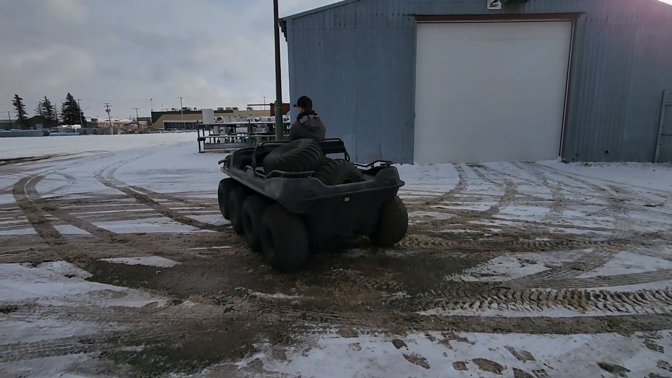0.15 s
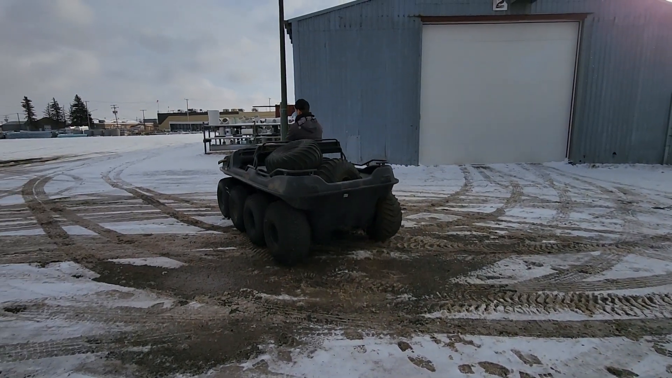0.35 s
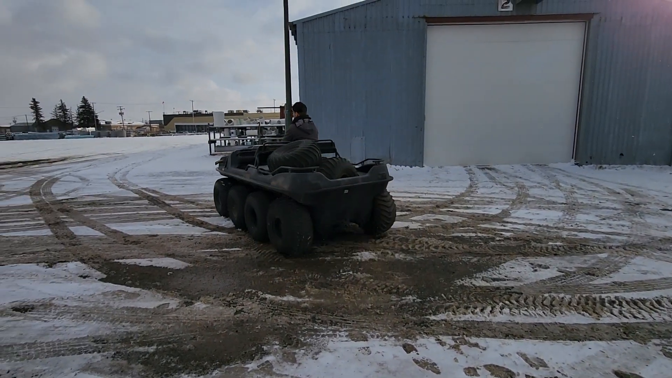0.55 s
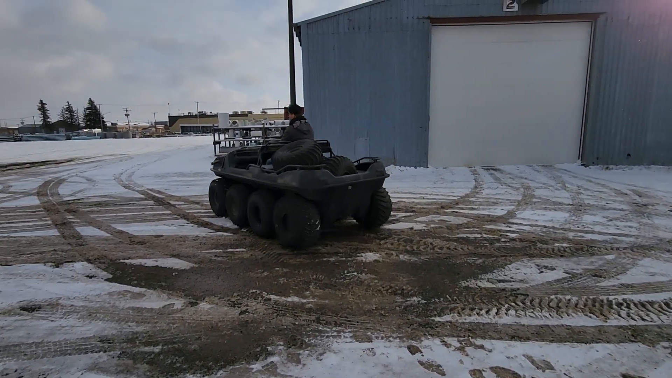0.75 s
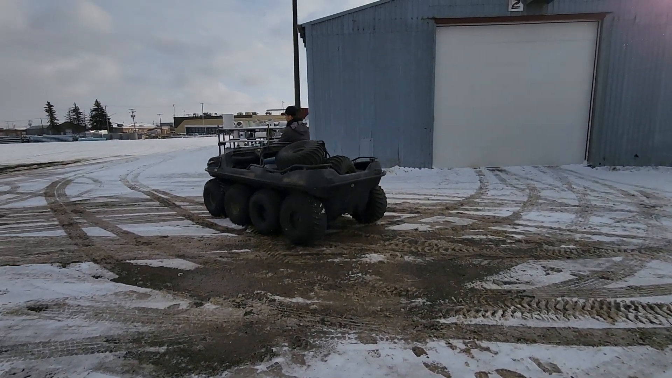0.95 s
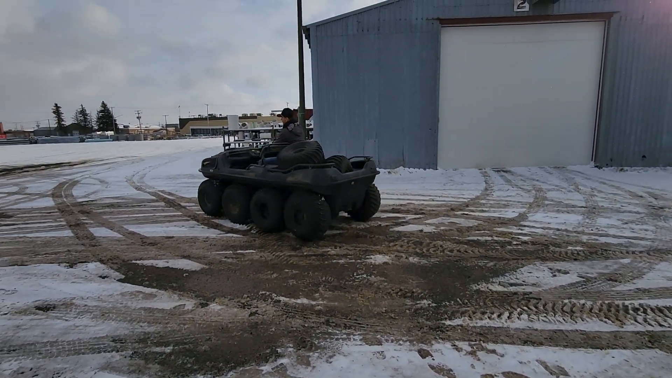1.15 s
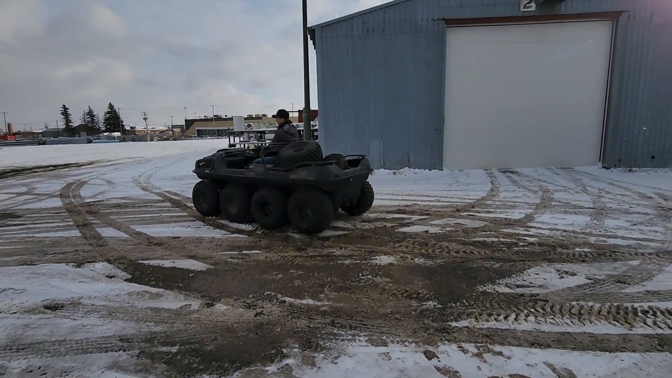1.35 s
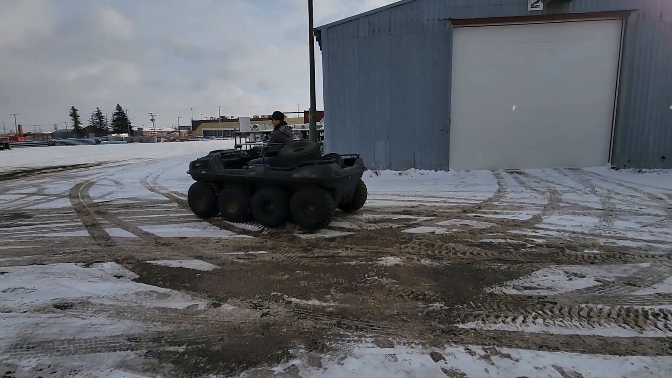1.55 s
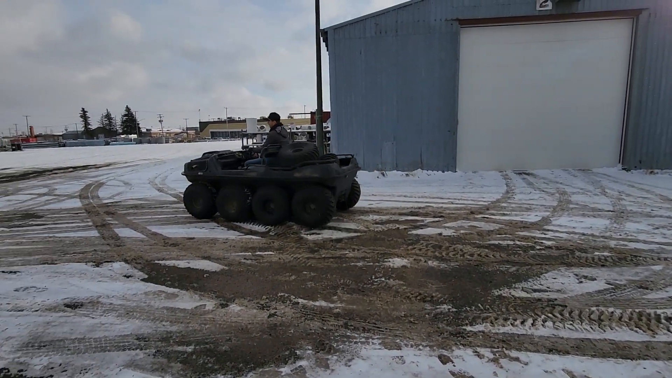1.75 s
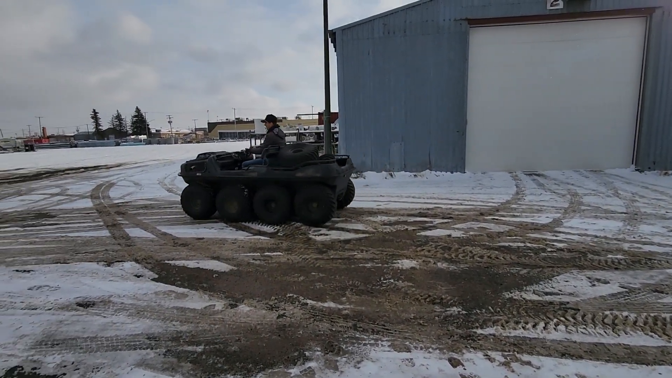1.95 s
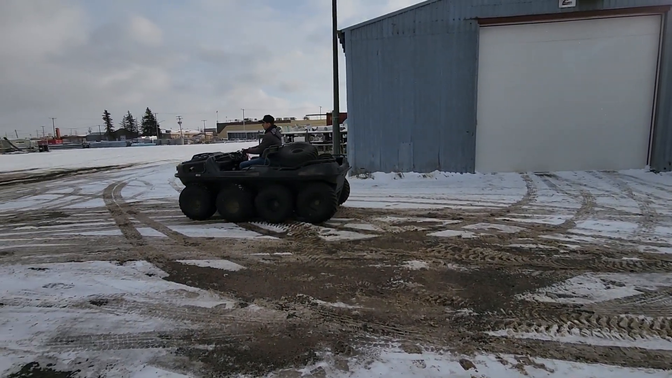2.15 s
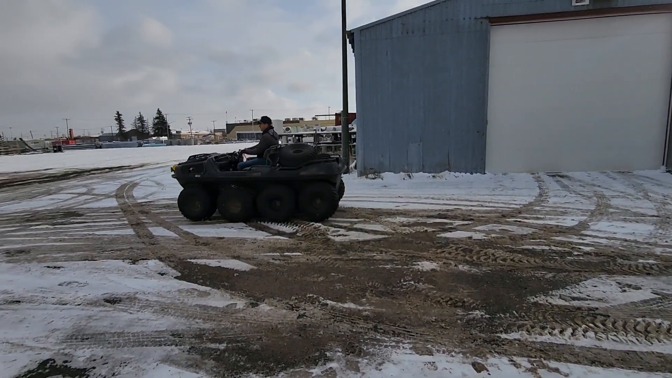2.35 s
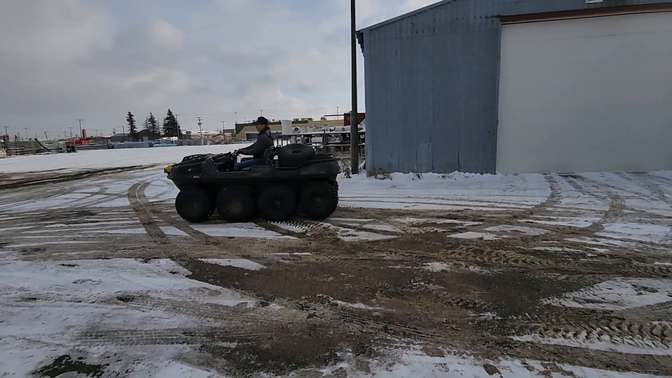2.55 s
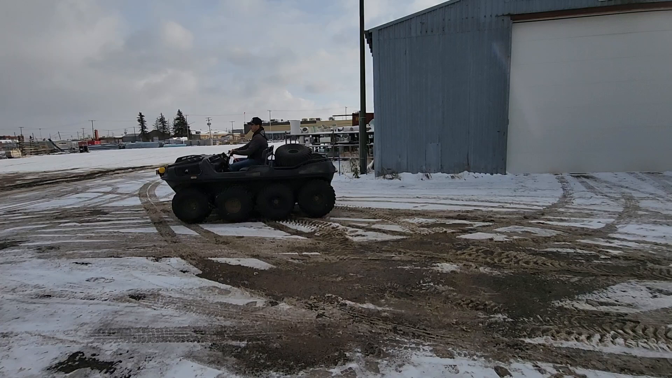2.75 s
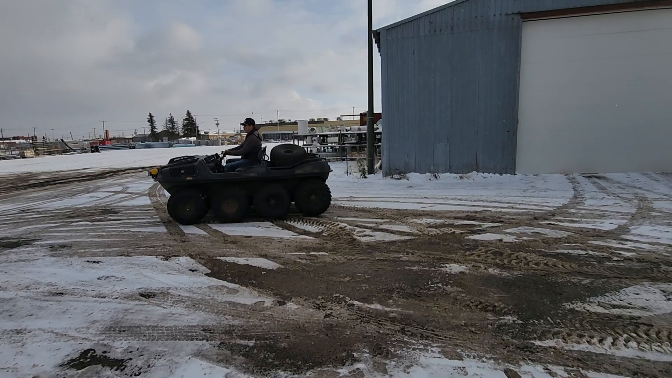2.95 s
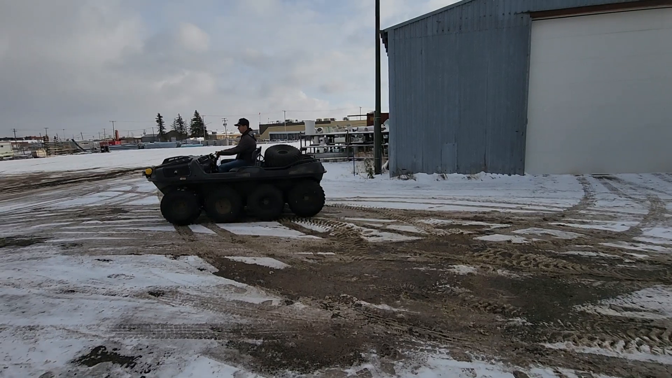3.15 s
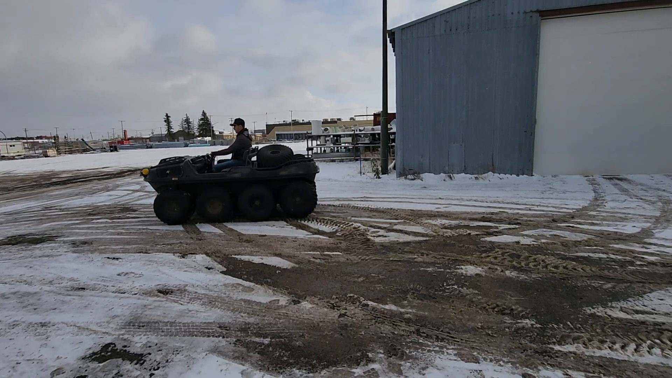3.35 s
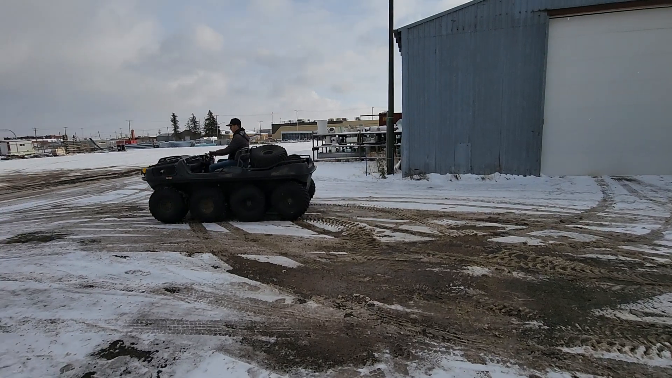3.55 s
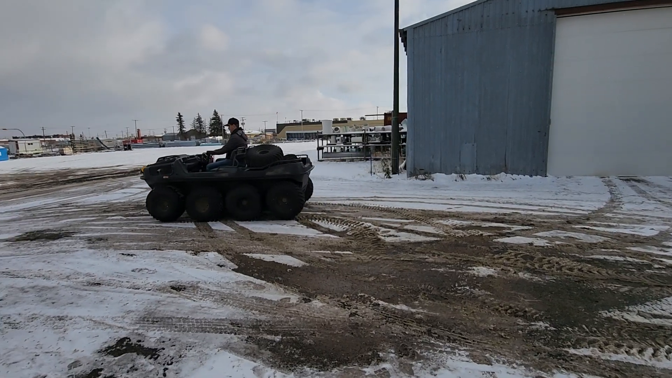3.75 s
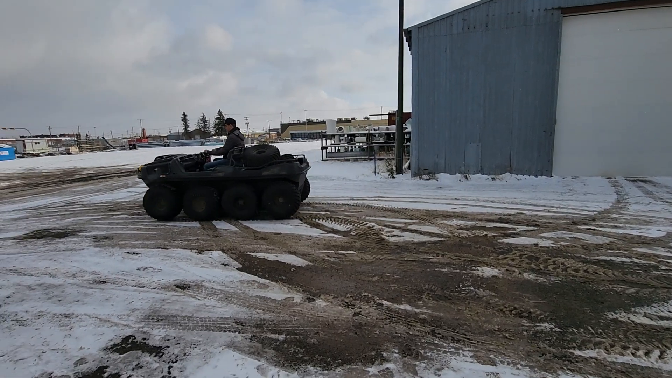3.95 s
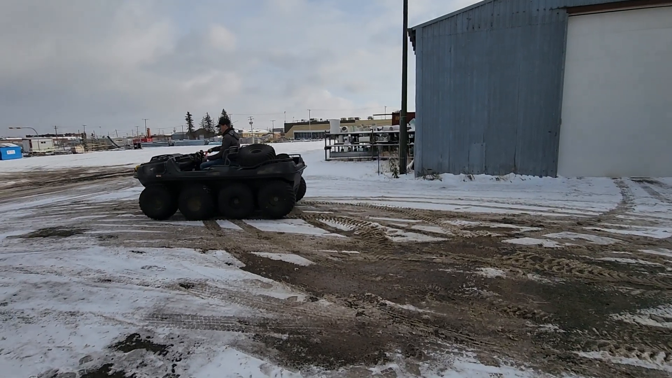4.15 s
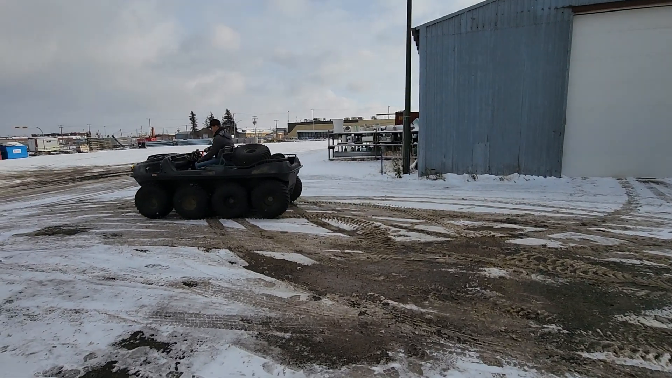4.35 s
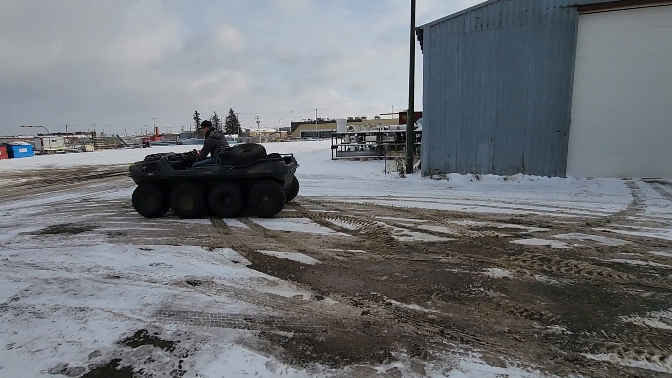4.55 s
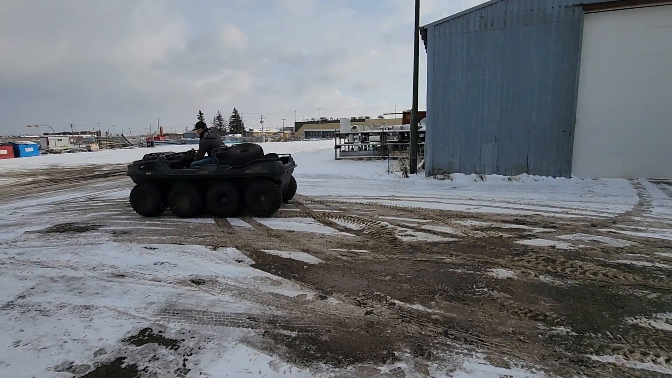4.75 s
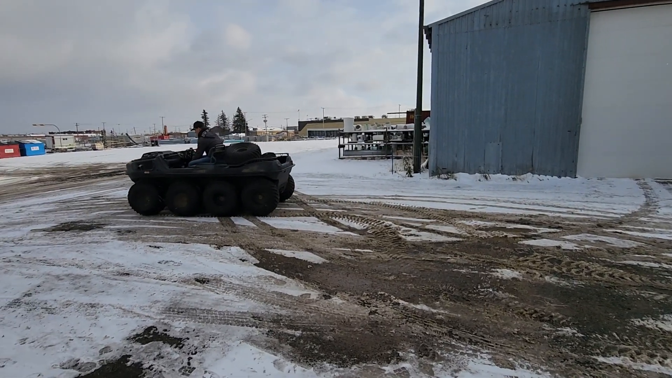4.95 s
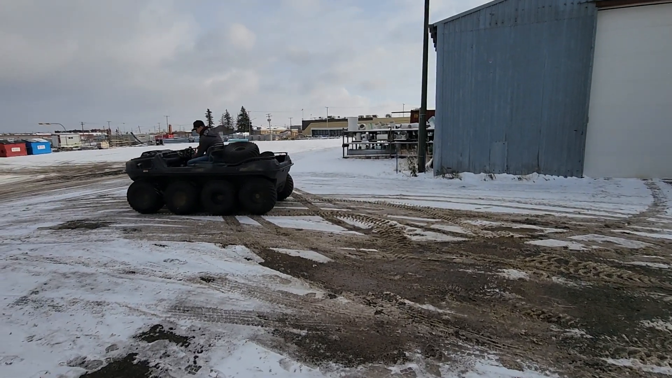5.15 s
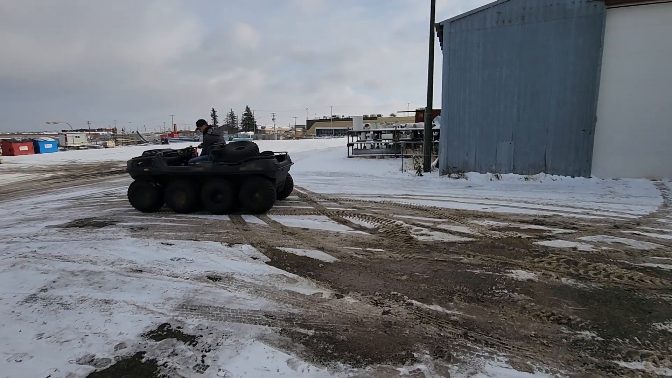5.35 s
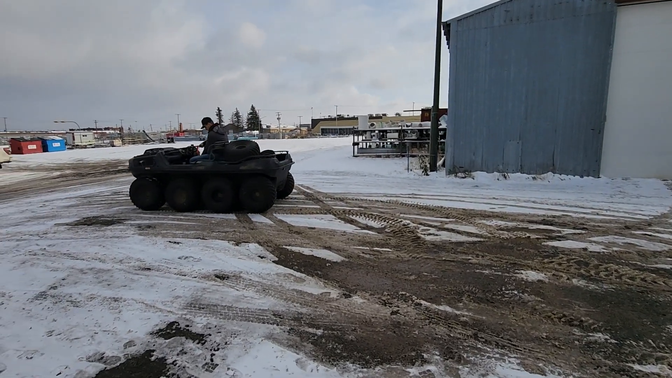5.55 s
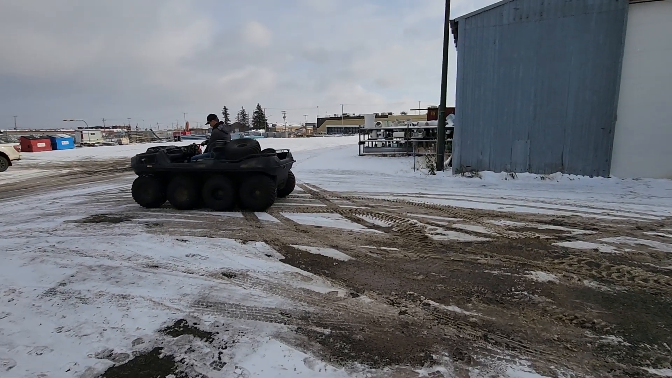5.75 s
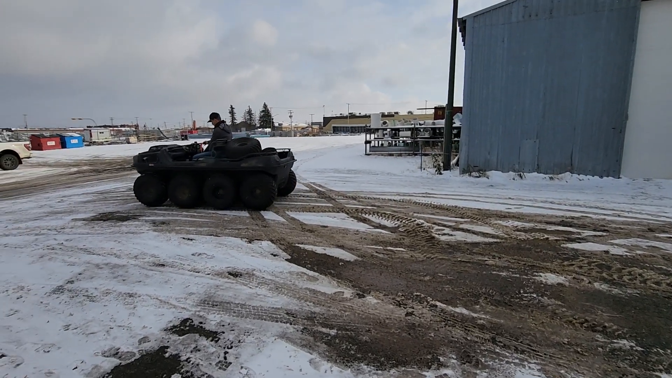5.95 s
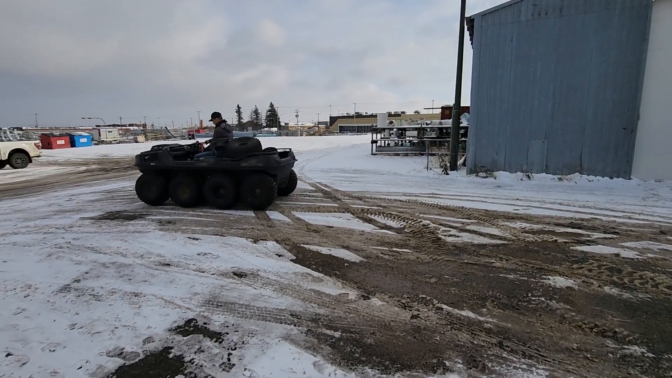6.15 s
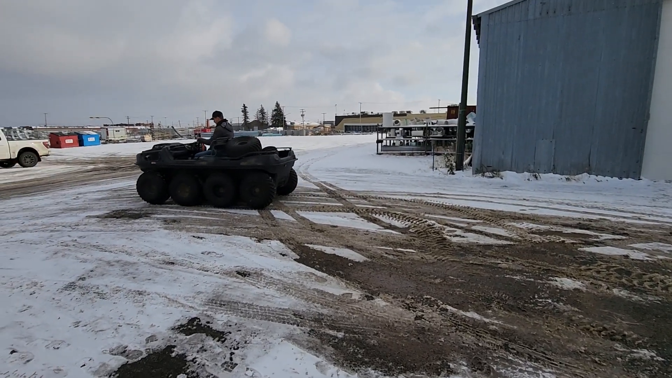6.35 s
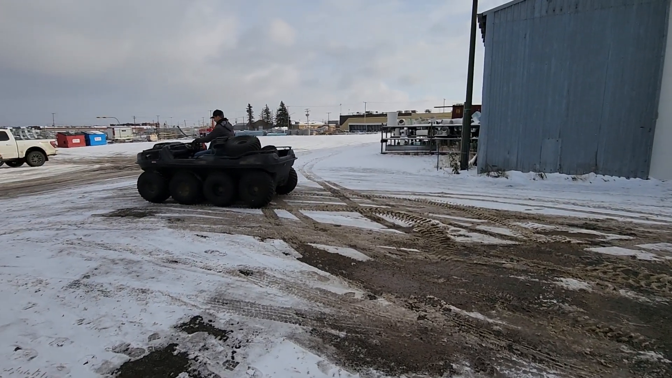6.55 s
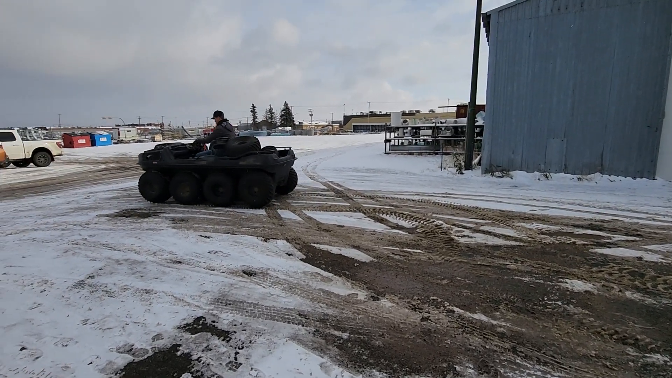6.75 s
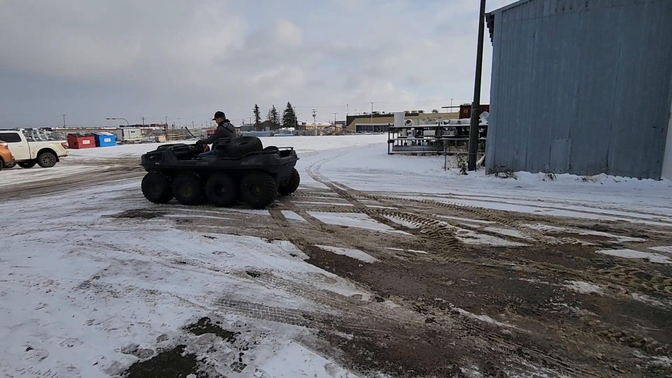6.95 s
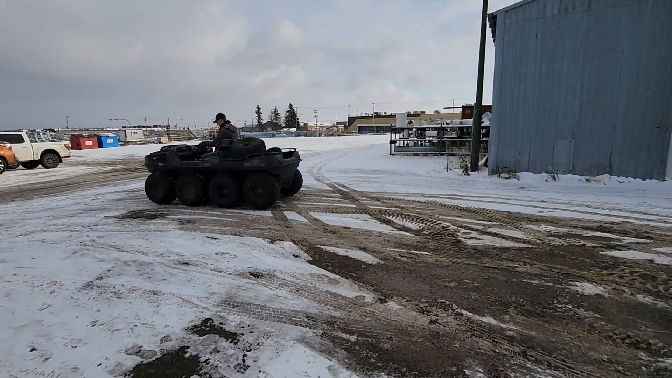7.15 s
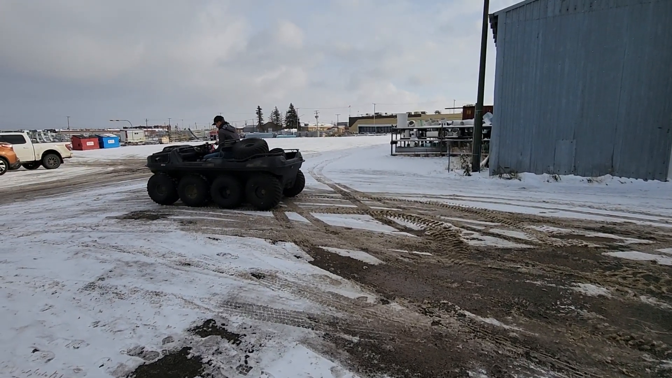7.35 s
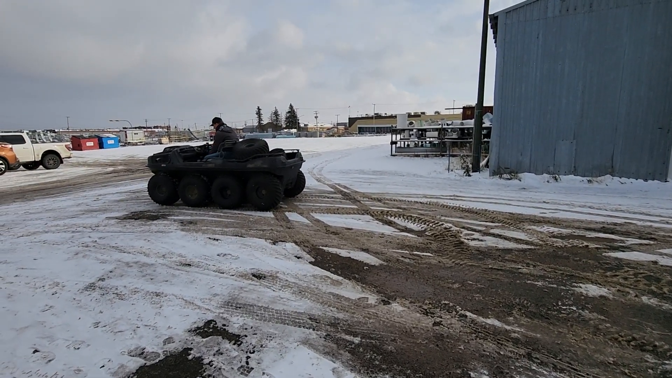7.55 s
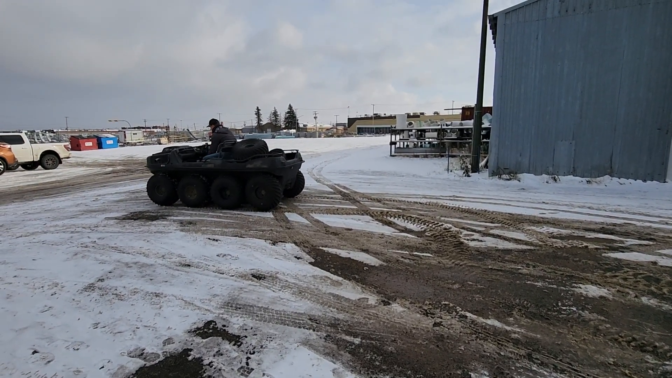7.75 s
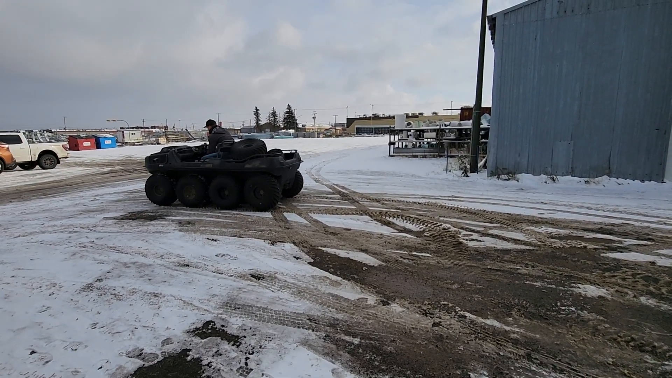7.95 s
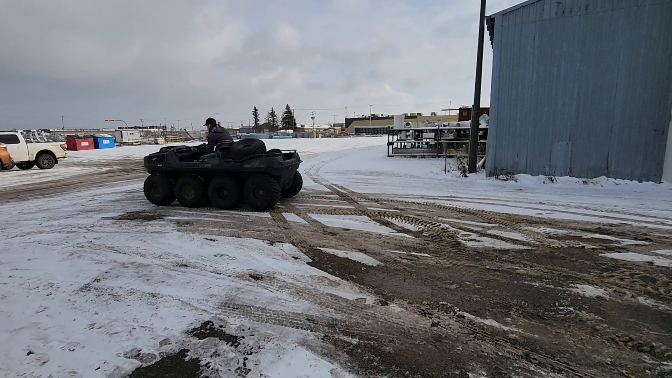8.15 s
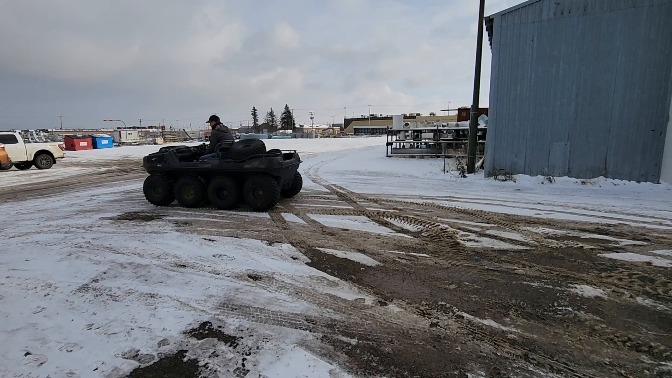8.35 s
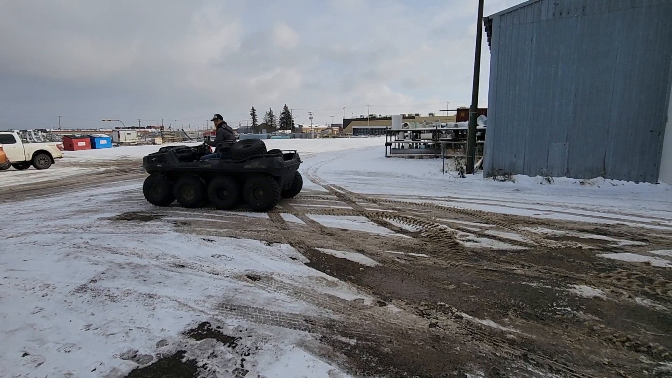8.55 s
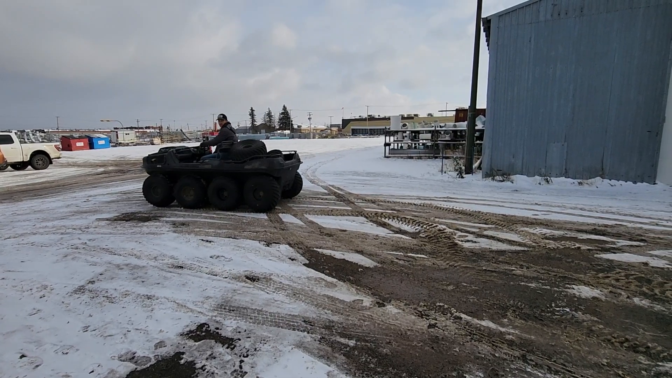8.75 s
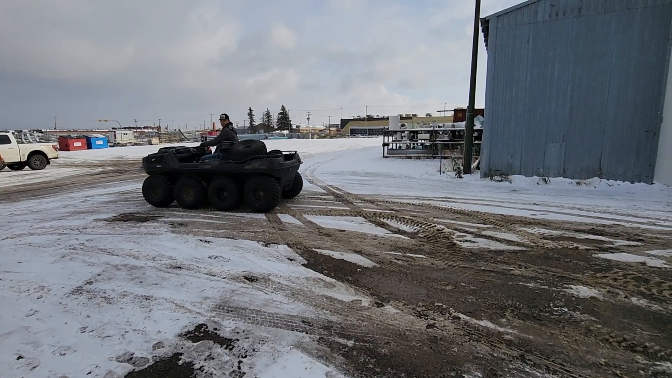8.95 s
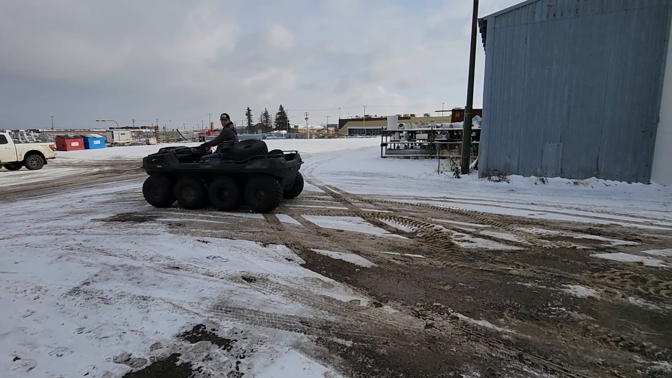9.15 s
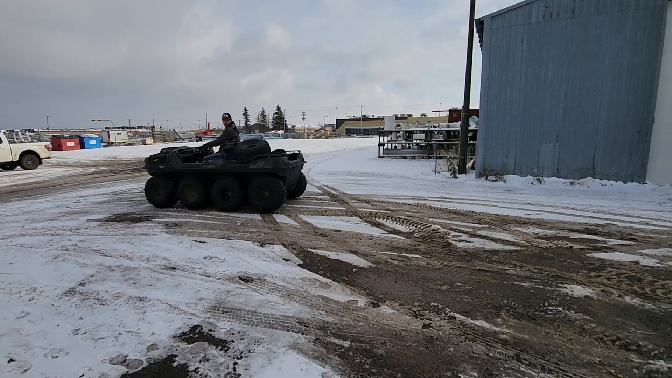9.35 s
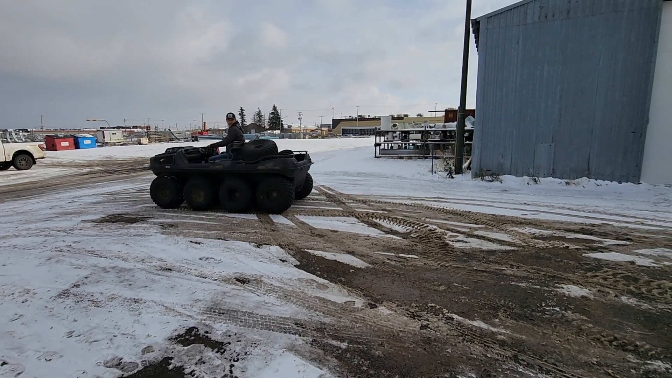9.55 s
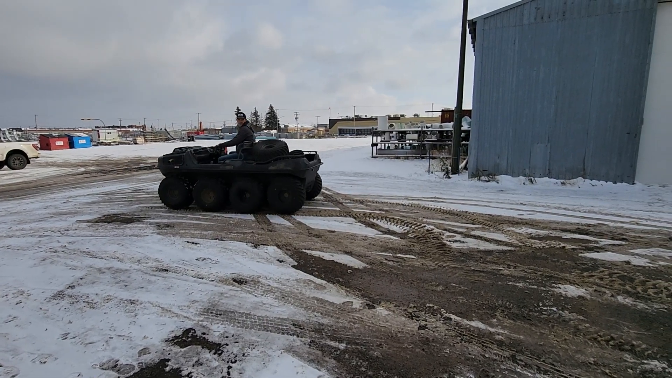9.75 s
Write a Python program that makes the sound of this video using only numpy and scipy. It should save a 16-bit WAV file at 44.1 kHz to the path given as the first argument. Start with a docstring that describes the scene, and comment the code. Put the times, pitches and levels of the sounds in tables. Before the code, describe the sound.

From 0 to 2.2 s a twin-cylinder off-road engine runs at brisk, steady speed about five to seven metres away, its uneven firings carrying rough gas roar, exhaust hiss and metallic clatter. The hollow body rattles and knocks, hardest around 1 to 1.3 s, with chain rasp, gritty tyre crunch and small squeaks. At about 2.4 s it surges with a tinny clack and muffler drone, then from 2.8 s coasts down, deeper and softer, reaching a lumpy slow idle by 4.3 s. Idling continues with spitting puffs, faint tyre swishes near 4.5 and 5.2 s, a soft deep rumble at 5.5 s and close dry crackles around 5.9 to 6.1 s. At 8.9 s the throttle snaps open: booming bark, bright hiss, thin metal clacking, then rolling rattle, easing slightly by 9.9 s. Low hum, faint open air and brief metal-wall reflections; sound leans left in stereo.

```python
"""In a frozen yard beside a metal shed, an eight-wheeled off-road vehicle drives past over ruts, idles, then revs again.
Its V-twin fires unevenly: pressure pulses resonate in the muffler and gate a hiss of gas, and the intake rings.
Noise shaken by the firings excites the engine metal; irregular blows excite the hollow body.
A low hum and faint open air lie behind, and decaying noise scatters the sound as the shed wall and ground do."""
import sys
import numpy as np
from scipy import signal
from scipy.fft import rfft, irfft, next_fast_len
from scipy.io import wavfile
from scipy.ndimage import uniform_filter1d, map_coordinates

SR = 44100
rng = np.random.default_rng(int(sys.argv[2]) if len(sys.argv) > 2 else 0)


def inscribe(sig):
    """Save sig as 16-bit PCM at rate SR to the path in sys.argv[1].

    A 1-D sig is mono; a 2-D sig holds one channel per row.
    Samples are clipped to [-1, 1] before scaling.
    """
    pcm = np.round(np.clip(np.atleast_2d(sig).T, -1, 1) * 32767)
    wavfile.write(sys.argv[1], SR, pcm.astype(np.int16))


N = 436149
# Levels in the tables are source levels, before any distance gain, stereo placement or echo.


def amp(db):
    """Level and amplitude: decibels become a linear gain."""
    return 10 ** (np.asarray(db) / 20)


def unit(x):
    """Normalisation: scale to rms 1."""
    return x / np.sqrt(np.mean(x ** 2) + 1e-20)


def along(points, hz):
    """Spectral envelope: interpolate (frequency [Hz], value) points on a log frequency axis."""
    f, v = np.transpose(points)
    return np.interp(np.log(hz + 1), np.log(f + 1), v)


def curves(rows):
    """Control curves: one value per sample for each column after the time."""
    times, *columns = np.transpose(rows)
    return [np.interp(np.arange(N) / SR, times, column) for column in columns]


def swells(rows):
    """Superposed envelopes: a bell-shaped gain around each (time [s], half length [s], level [dB])."""
    t = np.arange(N) / SR
    return sum(amp(db) * np.exp(-((t - s) / half) ** 2) for s, half, db in rows)


def wobble(rate):
    """Slow random modulation: a smooth curve through random knots, rate of them a second."""
    knots = rng.standard_normal(int(N * rate / SR) + 4)
    return map_coordinates(knots, [np.arange(N) * rate / SR])


def noise():
    """Broadband excitation: white noise of rms 1."""
    return rng.standard_normal(N)


def filtered(x, response):
    """Linear filtering: multiply the spectrum of x by a response of frequency."""
    size = next_fast_len(N + SR // 2, True)
    return irfft(rfft(x, size) * response(np.fft.rfftfreq(size, 1 / SR)), size)[..., :N]


def ring(x, broad, modes=(), size=16384):
    """Resonance: a minimum-phase filter of unit energy, broad colour plus (frequency, width, level) modes."""
    hz = np.fft.rfftfreq(size, 1 / SR)
    power = amp(along(broad, hz)) ** 2
    for f, width, db in modes:
        power = power + amp(db) ** 2 / (1 + ((hz - f) / width) ** 2 * 2) ** 2
    # Folding the cepstrum forward makes the response causal.
    cepstrum = irfft(np.log(power + 1e-12) / 2)
    cepstrum[1:size // 2] *= 2
    cepstrum[size // 2 + 1:] = 0
    response = irfft(np.exp(rfft(cepstrum)))
    return signal.oaconvolve(x, response / np.linalg.norm(response))[:N]


def taps(at, sizes):
    """Impulsive excitation: impulses of the given sizes at the given samples."""
    return np.bincount(np.clip(at, 0, N - 1).astype(int), sizes, N)


def bursts(blows, rise, hold, fall):
    """Transient envelope: each impulse swells, holds and dies away (times in s)."""
    t = np.arange(SR // 5) / SR
    shape = (1 - np.exp(-t / rise)) * np.exp(-np.maximum(t - hold, 0) / fall)
    return np.abs(signal.oaconvolve(blows, shape)[:N])


# the vehicle's path: (time [s], distance [m], full lead of the left microphone [s])
PATH = [(0, 5.22, 0.00025), (1.1, 6.56, 0.00033), (1.8, 7.44, 0.00045), (4, 7.26, 0.00046),
        (7, 7.2, 0.00048), (9.89, 9.16, 0.00045)]


def placed(x, spread):
    """Interaural delay: sound reaches the left microphone first, by a share (spread) of the full lead."""
    lead = curves(PATH)[1] * SR * spread / 2
    return np.array([map_coordinates(x, [np.arange(N) + side * lead]) for side in (1, -1)])


# colour of the open air: (frequency [Hz], level [dB])
OPEN_AIR = [(15, -17), (45, 1.5), (120, -3), (300, -23), (1000, -35.5), (4000, -39), (16000, -92)]


def background():
    """Ambient noise: faint open air, mostly alike at the two microphones with a weaker unrelated part."""
    common = amp(-33.5) * ring(noise(), OPEN_AIR)
    return common + amp(-50.5) * np.array([ring(noise(), OPEN_AIR) for side in range(2)])


def hum():
    """Harmonic tone: a steady low drone with its octave, wavering slightly in pitch and level."""
    phase = 2 * np.pi * np.cumsum(51.3 + .5 * wobble(3.02)) / SR
    tone = np.sin(phase) + amp(-10.0) * np.sin(2 * phase)
    return amp(-32 + wobble(5.6)) * tone * np.sqrt(2)


# reverberation of the shed: (frequency [Hz], time to decay by 60 dB [s])
SHED_DECAY = [(100, 0.32), (1000, 0.11), (5000, 0.18), (15000, 0.047)]


def echo(x):
    """Diffuse reflection: shed wall and ground scatter the sound as decaying noise; the pattern slowly shifts."""
    count = 8
    out = np.zeros((2, N))
    for k in range(count):
        hz, t, spectrum = signal.stft(rng.standard_normal((2, SR // 4)), SR, nperseg=256)
        decay = amp(-60 * t / along(SHED_DECAY, hz)[:, None])
        tail = signal.istft(spectrum * decay, SR, nperseg=256)[1]
        # Each pattern crossfades into the next.
        share = np.sqrt(np.clip(1 - np.abs(np.linspace(0, count - 1, N) - k), 0, 1))
        out += signal.oaconvolve((x * share)[None], tail / np.linalg.norm(tail[0]), axes=1)[:, :N]
    return out


# dry crackles close by: (time [s], level [dB])
CRACKLES = [(5.897, -22.5), (5.983, -24), (6.001, -24), (6.018, -28), (6.085, -20), (6.092, -25),
            (6.098, -16)]


def crackles():
    """Impulse radiation: a few short snaps with no ring, like crusted snow breaking."""
    s, db = np.transpose(CRACKLES)
    colour = [(300, -18), (900, 4), (1500, 2), (3000, -11), (6000, -20), (16000, -44)]
    return ring(taps(s * SR, amp(db + 10.0)), colour)


# swishes of tyres on snow: (time [s], half length [s], level [dB])
SCRUBS = [(4.52, 0.12, -51), (5.23, 0.11, -46.5)]


def scrub():
    """Friction noise: tyres swish over crusted snow as the vehicle creeps round."""
    colour = [(1000, -23), (3000, -9), (4700, -2), (6500, -6.0), (9000, -18), (16000, -11)]
    return swells(SCRUBS) * ring(noise(), colour)


def tyres():
    """Granular excitation: many uneven grains crunch as grit under the wheels."""
    count = 9000
    stones = rng.random((count, 2))
    grains = unit(taps(stones[:, 0] * N, amp(-3.5 * np.log(stones[:, 1] + 0.0033))))
    colour = [(200, -16.5), (420, 0.0), (700, -4.5), (1200, -9.5), (2700, -9.5),
              (4000, -25.5), (9000, -29), (16000, -26)]
    return ring(unit(grains + 0.5 * noise()), colour)


# resonances of the drive chains: (frequency [Hz], width [Hz], level [dB])
CHAINS = [(1330, 160, 4), (1460, 71, 0), (1660, 500, -4), (2197, 110, 0)]


def chains():
    """Resonant friction: the drive chains rasp over their sprockets, each resonance flaring on its own."""
    colour = [(300, -45), (1500, -35), (9000, -58)]
    flare_db = 2.5
    rasp = 0
    for hz, width, db in CHAINS:
        flare = amp(db + flare_db * wobble(28))
        rasp = rasp + flare * ring(noise(), colour, [(hz, width, 0)])
    return unit(rasp)


# resonances of the hollow body: (frequency [Hz], width [Hz], level [dB])
BODY = [(472, 64, -3), (560, 90, 4.5), (667, 100, 4), (836, 185, -1), (1370, 234, -5)]
# broad colour of the body beneath them: (frequency [Hz], level [dB])
BODY_BROAD = [(150, -19.5), (280, -8), (600, -11), (1000, -32), (1600, -14.5), (2500, -21.5), (4000, -21),
              (9000, -48), (16000, -36)]
BODY_DRIFT = .05  # scale of the wandering of the resonances, as a share of their pitch


def rattle():
    """Forced vibration: chains and tyre lugs drum on the body; its resonances wander as the hull flexes."""
    count = 5000
    blows = rng.random((count, 2))
    patter = unit(taps(blows[:, 0] * N, amp(-3.8 * np.log(blows[:, 1] + 0.0079))))
    drive = unit((patter + 0.93 * noise()) * amp(1.7 * wobble(30)))
    flexing = np.cumsum(BODY_DRIFT * wobble(9))  # a varying time shift bends the pitch
    return map_coordinates(ring(drive, BODY_BROAD, BODY), [np.arange(N) + flexing], mode="wrap")


# jolts of body and running gear:
# (time [s], relative metal clack level [dB], panel level [dB], panel pitch [Hz])
KNOCKS = [(0.135, -19, -20, 470), (0.335, -18, -15, 670), (0.45, -15, -16, 857), (0.605, -20, -15, 630),
          (0.656, -22, -12, 855), (0.744, -18, -9, 472), (0.997, -8, -9, 550), (1.127, -20, -11, 645),
          (1.222, -11, -8, 655), (1.406, -31, -15, 560), (1.53, -29, -15, 640), (1.56, -24, -18, 650),
          (2.144, -25, -10.5, 700), (2.186, -26, -11, 634), (2.811, -22, -10, 588), (2.853, -21, -18, 850),
          (3.446, -16, -34, 810), (3.557, -12.5, -27, 1170), (3.607, -24, -32, 1280),
          (4.081, -35, -19, 619), (4.125, -20, -19, 585), (6.638, -29, -26, 600), (7.929, -21, -34, 610),
          (8.008, -17, -32, 630), (8.609, -20.5, -36, 647), (9.347, -20, -13, 640), (9.83, -28, -20, 590)]
# modes of a struck panel: (multiple of its pitch [ratio], level [dB], time to decay by 60 dB [s])
PANEL = [(.55, -9, 0.016), (1, -3, 0.053), (1.42, -13, 0.03)]


def knocks():
    """Modal decay: each jolt rings a panel of the body at its own pitch, with a sharper clack of metal."""
    s, clack_db, _, _ = np.transpose(KNOCKS)
    t = np.arange(SR // 8) / SR
    onset = 1 - np.exp(-t / 0.00086)
    panels = np.zeros(N + SR)
    for start, _, panel_db, hz in KNOCKS:
        tock = sum(amp(db - 60 * t / t60) * np.sin(2 * np.pi * hz * ratio * t) for ratio, db, t60 in PANEL)
        panels[round(start * SR):][:len(t)] += amp(panel_db) * tock * onset
    scrape = bursts(taps(s * SR, amp(clack_db - 10.5)), rise=0.00012, hold=0.00056, fall=0.01) * noise()
    colour = [(300, -13), (800, 21.0), (1400, 19.0), (3000, 2.5), (6000, -3), (16000, -33)]
    return panels[:N] + ring(scrape, colour)


HULL_HZ = 920  # below this the whole hull radiates


def shaken(x):
    """Source extent: lows come from the whole hull, treble from one spot, so treble lags more between sides."""
    low = filtered(x, lambda hz: 1 / (1 + (hz / HULL_HZ) ** 6))
    return placed(low, spread=0.34) + placed(x - low, spread=0.9)


# how hard the rolling wheels shake the body: (time [s], level [dB])
ROLLING = [(0, -34.5), (.4, -32), (1.2, -26), (1.7, -30), (2.6, -28.5), (3.1, -40.5), (3.8, -39),
           (4.7, -43), (6.1, -43), (7.1, -51), (8.85, -49.5), (9.1, -41), (9.35, -31.5), (9.65, -34.5),
           (9.89, -30)]
# ruts that set the body rattling for a moment: (time [s], half length [s], level [dB])
RUTS = [(.16, 0.025, -35), (2.8, 0.18, -29), (3.25, 0.22, -29.5), (4.1, 0.2, -37.5), (6.64, 0.029, -40),
        (8.02, 0.06, -40.5), (8.64, 0.028, -43)]
CHAIN_DB, GRIT_DB = -9.5, -16.5  # relative to the body rattle; grit also depends on nearness
GRIT_NEAR = 5.55  # extra dB of grit for each dB of nearness


def running_gear(near):
    """Structure-borne excitation: wheels and ruts shake the body, chains and grit; jolts knock its panels."""
    shaking = np.hypot(amp(curves(ROLLING)[0]), swells(RUTS))
    grit = amp(GRIT_DB) * near ** GRIT_NEAR * tyres()
    return near * shaking * (rattle() + amp(CHAIN_DB) * chains() + grit) + knocks()


IDLE_RATE, CRUISE_RATE = 11.5, 19.5  # four-stroke cycles per second
IDLE_THROTTLE = .3


def pace(rate):
    """Normalised engine speed: 0 at idle, 1 at cruising speed."""
    return (rate - IDLE_RATE) / (CRUISE_RATE - IDLE_RATE)


def follow(law, rate, throttle):
    """Source-level law: a level in dB that varies linearly with speed and with throttle."""
    idle_db, speed_db, throttle_db = law
    return idle_db + speed_db * pace(rate) + throttle_db * (throttle - IDLE_THROTTLE)


WAVER_CYCLES = .004  # scale of the crank's wavering at cruising speed


def firings(rate):
    """Uneven periodicity: sample and cylinder (0 or 1) of each firing; the drive's load makes the crank waver."""
    waver = WAVER_CYCLES * pace(rate) * wobble(7)
    cycle = np.cumsum(rate) / SR + waver + .53
    index = np.arange(2, 2 * int(cycle[-1]) + 2)
    cylinder = index % 2
    angle = index // 2 + cylinder * 3 / 8  # the second follows the first by 270 of 720 degrees
    inside = angle < cycle[-1]
    return np.searchsorted(cycle, angle[inside]), cylinder[inside]


# resonances of a loose thin metal piece: (frequency [Hz], width [Hz], level [dB])
SHIELD = [(4750, 240, -1), (5500, 270, 3), (6400, 220, -13)]
# spells of tinny clacking: (time [s], half length [s], level [dB])
CLACKS = [(2.36, .1, -40.5), (9.15, 0.13, -31.5)]


def shield(at):
    """Impact excitation: under hard throttle a loose piece of thin metal clacks with every firing."""
    sizes = amp(2 * rng.standard_normal(len(at)))
    hits = unit(bursts(taps(at, sizes), rise=0.00067, hold=0.0028, fall=0.0046))
    return swells(CLACKS) * ring(hits * noise(), [(2000, -44), (5500, -18), (12000, -42)], SHIELD)


# resonances of the squeak: (frequency [Hz], width [Hz], level [dB])
SQUEAK = [(5095, 87, -1), (5350, 240, -17), (7250, 250, -12)]
# spells of metallic chirping: (time [s], half length [s], level [dB])
CHIRPS = [(.22, 0.071, -46.5), (.8, 0.094, -44), (1.17, 0.041, -44), (1.49, 0.21, -38), (2.74, 0.18, -42.5),
          (9.45, 0.33, -44.5)]
SECOND_CHIRP_DB = 8  # the second cylinder's tug chirps louder


def chirp(at, cylinder):
    """Gated resonance: something in the drive gives a short, grainy squeak with every tug of the engine."""
    sizes = amp(SECOND_CHIRP_DB * cylinder + 2.0 * rng.standard_normal(len(at)))
    tugs = unit(bursts(taps(at, sizes), rise=0.0018, hold=0.0064, fall=0.0039))
    return swells(CHIRPS) * ring(tugs * noise(), [(2000, -60), (6000, -36), (16000, -40)], SQUEAK)


# resonances of the engine metal: (frequency [Hz], width [Hz], level [dB])
METAL = [(695, 150, -11), (860, 100, -6), (1284, 130, -5), (1500, 230, -4.5), (1680, 190, -1),
         (2220, 220, -7.5)]
# broad colour beneath them: (frequency [Hz], level [dB])
METAL_BROAD = [(150, -15), (320, -1), (450, -19), (1000, -8.5), (2000, -25), (2800, -23), (5000, -25),
               (9000, -37), (16000, -40)]
# clatter level: (at idle [dB], more at cruising speed [dB], per unit of throttle [dB])
CLATTER_LAW = (-44, 5.7, 2.9)


def clatter(at, rate, throttle):
    """Forced vibration: valve gear and pistons shake the engine's metal after every firing."""
    sizes = amp(6.5 * rng.standard_normal(len(at)))
    shake = unit(bursts(taps(at, sizes), rise=0.0026, hold=0.0043, fall=0.032))
    drive = unit(1 + 0.39 * shake) * noise()
    return amp(follow(CLATTER_LAW, rate, throttle)) * ring(drive, METAL_BROAD, METAL)


# narrow resonances of the air intake: (frequency [Hz], width [Hz], level [dB])
INTAKE = [(858, 55, -2), (1685, 105, 0), (2230, 120, -7)]
# intake level: (at idle [dB], more at cruising speed [dB], per unit of throttle [dB])
INTAKE_LAW = (-55, -1.1, 27.3)


def intake(at, rate, throttle):
    """Duct resonance: each gulp of air sounds the intake's narrow modes, loudest on an open throttle."""
    gulps = unit(bursts(taps(at, np.ones(len(at))), rise=0.0028, hold=0.011, fall=0.028))
    tone = ring(gulps * noise(), [(300, -37.0), (1500, -10), (6000, -47)], INTAKE)
    return amp(follow(INTAKE_LAW, rate, throttle)) * tone


# high resonances of the metal: (frequency [Hz], width [Hz], level [dB])
WHISTLES = [(3314, 89, 0), (3590, 81, 2), (4290, 105, 0), (4726, 110, 5), (5340, 200, 0), (5970, 160, -4),
            (6617, 183, 3), (9100, 93, -6.5), (12220, 350, -4.5)]
# ringing level: (at idle [dB], more at cruising speed [dB], per unit of throttle [dB])
WHISTLE_LAW = (-45, -13, 19.2)


def whistles(at, puffs, rate, throttle):
    """Flow-excited resonance: each puff briefly rings the metal's narrow high modes in a new mix."""
    stroke = np.searchsorted(at, np.arange(N) + 0.0079 * SR)  # the mix changes just before a firing
    ringing = np.zeros(N)
    for hz, width, db in WHISTLES:
        strength = amp(rng.uniform(-7.5, 7.5, len(at) + 1))[stroke]
        pitch = hz + .7 * width * rng.standard_normal(len(at) + 1)[stroke]
        phase = 2 * np.pi * np.cumsum(pitch + .9 * width * wobble(400)) / SR
        ringing += amp(db) * strength * np.sin(phase)
    gated = unit(ringing * np.roll(puffs, round(0.0043 * SR)))
    return amp(follow(WHISTLE_LAW, rate, throttle)) * gated


# extra bright puffs at idle: (time [s], level [dB])
SPITS = [(4.521, -36), (4.688, -38), (4.946, -37), (5.302, -36), (5.48, -38), (6.2, -41), (7.179, -36),
         (7.263, -38), (7.524, -37), (7.955, -35), (8.298, -43), (8.47, -34), (8.556, -40), (8.906, -39)]


def spits():
    """Jet noise: now and then at idle the engine spits out a much brighter puff."""
    s, db = np.transpose(SPITS)
    puffs = bursts(taps(s * SR, amp(db)), rise=0.0014, hold=0.0054, fall=0.0053)
    colour = [(3000, -26), (7000, -5), (10000, -7), (12500, 5), (14000, -1), (16000, -12)]
    return ring(puffs * noise(), colour)


# second cylinder's puff over the first: (at idle [dB], more at cruising [dB], per unit of throttle [dB])
SECOND_PUFF_LAW = (-3.5, 2.1, 5.3)


def exhaust_puffs(at, cylinder, rate, throttle):
    """Pulsating flow: an envelope of gas released at each firing, long at idle and short at speed."""
    second_db = follow(SECOND_PUFF_LAW, rate, throttle)
    sizes = amp(second_db[at] * cylinder + 1.6 * rng.standard_normal(len(at)))
    fast = np.clip(pace(rate[at]), 0, 1)
    long_puffs = bursts(taps(at - 0.0047 * SR, sizes * (1 - fast)), rise=0.0013, hold=0.0074, fall=0.0094)
    short_puffs = bursts(taps(at, sizes * fast), rise=0.0006, hold=0.0048, fall=0.0046)
    return long_puffs + amp(2.0) * short_puffs


# colour of the hiss: (frequency [Hz], level [dB])
HISS_BROAD = [(1000, -47), (2800, -7.5), (4500, -2), (7000, -3.5), (8400, -6.5), (10000, -4.5), (13000, -3),
              (16000, -9)]
# thin top of each puff: (frequency [Hz], level [dB])
SIZZLE = [(6000, -42), (10000, -8), (12400, 0), (14000, -1), (16000, -6)]
# that thin treble against the hiss: (time [s], level [dB])
SIZZLE_LEVEL = [(0, -8), (2.4, -9), (3.4, -20), (4.3, 4), (5.6, -1), (6.5, -15), (7.3, -10), (9.89, -25)]
# hiss, and steady leak against the puffs:
# (at idle [dB], more at cruising speed [dB], per unit of throttle [dB])
HISS_LAW = (-49, 0.51, 20.5)
LEAK_LAW = (-12.5, 13.4, -23.5)


def hiss(puffs, rate, throttle):
    """Jet turbulence: gas spits out as each exhaust valve opens, over a steadier leak."""
    leak = amp(follow(LEAK_LAW, rate, throttle)) ** 2
    gate = np.sqrt((unit(puffs) ** 2 + leak) / (1 + leak))
    spit = unit(gate * amp(3.8 * wobble(350)))
    # The spray of noise arrives partly alike and partly unrelated at the two microphones.
    alike = ring(spit * noise(), HISS_BROAD)
    alike += amp(curves(SIZZLE_LEVEL)[0]) * ring(unit(puffs) * noise(), SIZZLE)
    unrelated = np.array([ring(spit * noise(), HISS_BROAD) for side in range(2)])
    return amp(follow(HISS_LAW, rate, throttle)) * (placed(alike, spread=0.87) + amp(-0.5) * unrelated)


# colour of the gas roar: (frequency [Hz], level [dB])
ROAR_BROAD = [(150, -19), (300, -13), (450, 0), (600, -4), (950, -2), (1350, -5.5), (1900, -9), (2700, -12),
              (8000, -41)]
# swell of the roar: (time [s], half length [s], level [dB])
ROAR = [(.75, 0.47, -32)]


def roar(at):
    """Directivity: while the tailpipe faces the listener, each firing carries a broad, rough rush of gas."""
    sizes = amp(3.9 * rng.standard_normal(len(at)))
    blasts = unit(bursts(taps(at, sizes), rise=0.0024, hold=0.012, fall=0.027))
    return swells(ROAR) * ring(blasts * noise(), ROAR_BROAD)


# deep rumble: (time [s], half length [s], level [dB])
THUD = [(5.48, 0.069, -28)]


def thud():
    """Low-frequency noise: a soft, deep rumble swells for a moment while the vehicle idles."""
    colour = [(30, -27), (65, -5), (105, 1), (150, -16), (240, -15.5), (400, -47), (1000, -70)]
    return swells(THUD) * ring(noise(), colour)


# spells in which the muffler booms: (time [s], half length [s], level [dB], pitch [Hz])
BOOMS = [(2.4, .45, -36.5, 215), (8.979, 0.029, -23.5, 194), (9.094, 0.11, -27, 146),
         (9.497, .3, -32.5, 150)]
BOOM_WIDTH_HZ = 27


def booms(flow):
    """Cavity resonance: under a wide throttle pulses ring the muffler, a bark as it snaps open or a longer drone."""
    out = 0
    for s, half, db, hz in BOOMS:
        boom = ring(flow, [(20, -60), (200, -34), (900, -82)], [(hz, BOOM_WIDTH_HZ, 0)])
        out = out + swells([(s, half, db)]) * boom
    return out


# muffler colour at idle, under load and on the overrun (throttle shut at speed):
# (frequency [Hz], level [dB])
MUFFLER_IDLE = [(10, -28), (19, -23), (25, -10), (33, 1), (58, 6), (70, -0.5), (95, -5.5), (125, 2),
                (160, 4), (185, -2), (225, -17.5), (320, -19.5), (450, -40), (900, -68)]
MUFFLER_LOAD = [(10, -65), (20, -38), (32, -6), (39, 2), (58, -15.5), (78, 8.5), (100, 2.5), (125, 4.5),
                (155, -3.5), (180, -8), (210, -1.5), (250, -10.5), (300, -24), (400, -32.5), (900, -55)]
MUFFLER_OVERRUN = [(10, -48), (22, -11), (33, 2), (46, 2.5), (58, 7), (70, -12), (90, -7), (120, -4),
                   (155, -3.5), (200, -7), (260, -12), (400, -35), (900, -57)]
# overrun boom, while the wheels drive the engine: (time [s], share [0-1])
OVERRUN = [(2.8, 0), (2.97, .85), (3.35, .85), (3.7, 0)]
# thump level: (at idle [dB], more at cruising speed [dB], per unit of throttle [dB])
THUMP_LAW = (-31.5, 6.5, 8.8)
OVERRUN_DB = 1  # extra thump on the overrun
LOAD_PER_RATE, LOAD_PER_THROTTLE = 0.14, 0.25  # share of the loaded boom gained above idle


def thump(at, rate, throttle):
    """Filtered pulse train: firings drive the muffler; load brings out its boom, coasting a deeper one."""
    chance = rng.standard_normal((len(at), 2))
    sizes = amp(1.5 * chance[:, 1]) / np.sqrt(rate[at])
    pulses = unit(taps(at + chance[:, 0] * 0.00025 * SR, sizes))
    flow = pulses + amp(-11.5) * noise()  # turbulence rides on the pulses
    load = LOAD_PER_RATE * (rate - IDLE_RATE) + LOAD_PER_THROTTLE * (throttle - IDLE_THROTTLE)
    load = np.clip(load, 0, 1)
    driving = np.sqrt(1 - load) * ring(flow, MUFFLER_IDLE) + np.sqrt(load) * ring(flow, MUFFLER_LOAD)
    coasting = amp(OVERRUN_DB) * ring(flow, MUFFLER_OVERRUN)
    overrun = np.clip(curves(OVERRUN)[0], 0, 1)
    mixed = (1 - overrun) * driving + overrun * coasting
    return amp(follow(THUMP_LAW, rate, throttle)) * mixed + booms(flow)


# engine speed: (time [s], four-stroke cycles, each firing both cylinders once [per s])
SPEED = [(0.0, 19.424), (0.55, 19.352), (0.8, 19.695), (1.1, 19.354), (1.68, 19.706), (2.25, 19.38),
         (2.48, 21.293), (2.78, 21.099), (3.09, 19.163), (3.3, 16.446), (3.5, 14.783), (3.85, 13.724),
         (4.3, 12.054), (4.7, 11.826), (5.16, 11.162), (5.6, 11.243), (6.27, 10.985), (7.06, 11.457),
         (8.12, 11.707), (8.88, 11.331), (9.02, 14.414), (9.14, 18.287), (9.28, 20.038), (9.5, 18.316),
         (9.89, 17.004)]
# throttle: (time [s], opening, 0 shut, about .3 at idle, 1 wide open [0-1])
THROTTLE = [(0, 0.26), (.35, 0.52), (.85, 0.56), (1.05, 0.51), (2.24, 0.64), (2.37, 0.83), (2.62, 0.47),
            (2.82, 0.55), (3.0, 0.25), (3.7, 0.028), (5.7, 0.24), (8.86, 0.34), (8.97, 1), (9.21, 0.97),
            (9.35, 0.59), (9.61, 0.77), (9.78, 0.23), (9.89, 0.17)]
FAR_M = 7.5  # distance of unit gain


def scene():
    """Superposition: sum engine, body, air and echo; the continuous vehicle sounds follow inverse distance."""
    rate, = curves(SPEED)
    throttle, = curves(THROTTLE)
    near = FAR_M / curves(PATH)[0]
    at, cylinder = firings(rate)
    body = running_gear(near) + roar(at)
    puffs = exhaust_puffs(at, cylinder, rate, throttle)
    metal = clatter(at, rate, throttle) + whistles(at, puffs, rate, throttle)
    metal = near * (metal + chirp(at, cylinder) + shield(at) + intake(at, rate, throttle))
    gas = near * hiss(puffs, rate, throttle) + placed(spits() + scrub(), spread=0.89)
    exhaust = near * thump(at, rate, throttle) + thud()
    direct = placed(exhaust, spread=0.055) + shaken(body) + placed(metal, spread=0.925) + gas
    scattered = echo(amp(-24) * exhaust + amp(-5) * body + amp(-3) * metal + amp(-1.0) * gas[0])
    return direct + scattered + crackles() + hum() + background()


# colour of the left microphone over the right: (frequency [Hz], level difference [dB])
TILT = [(60, 0), (380, -1.5), (700, -1.5), (1300, -3.3), (2400, -5.5), (4400, -1.5), (6200, -10), (8100, 8),
        (11000, 2), (15000, -4.5)]
TOP_HZ = 16000


def record(dry):
    """Transducer response: the two microphones differ in colour; nothing passes above the band limit."""
    return filtered(dry, lambda hz: amp(np.outer([.5, -.5], along(TILT, hz))) * (hz < TOP_HZ))


dry = scene()
out = record(dry)
inscribe(out)
```